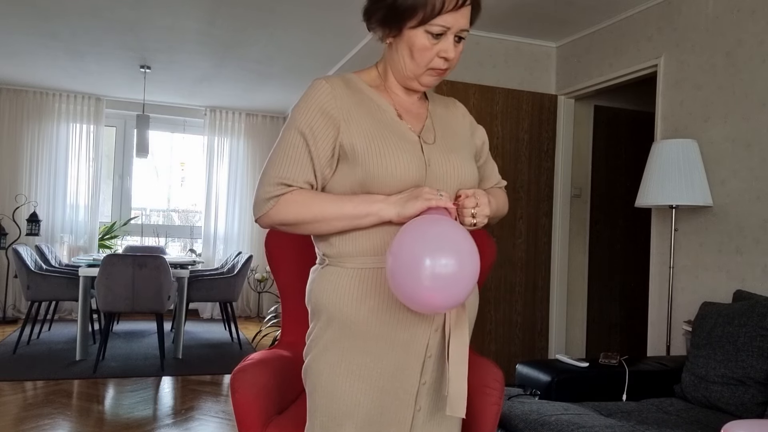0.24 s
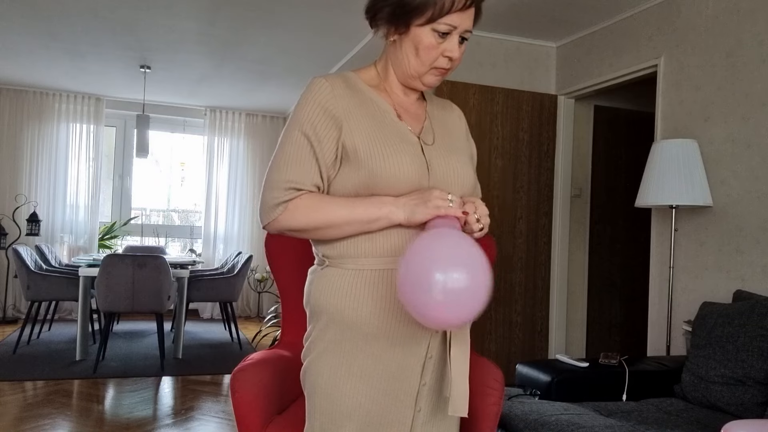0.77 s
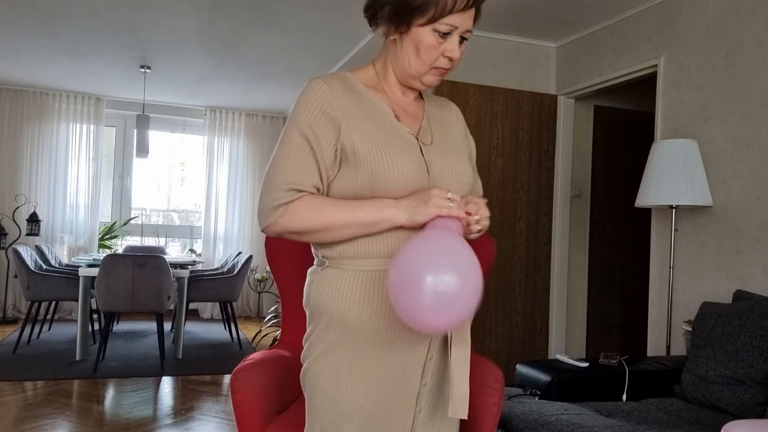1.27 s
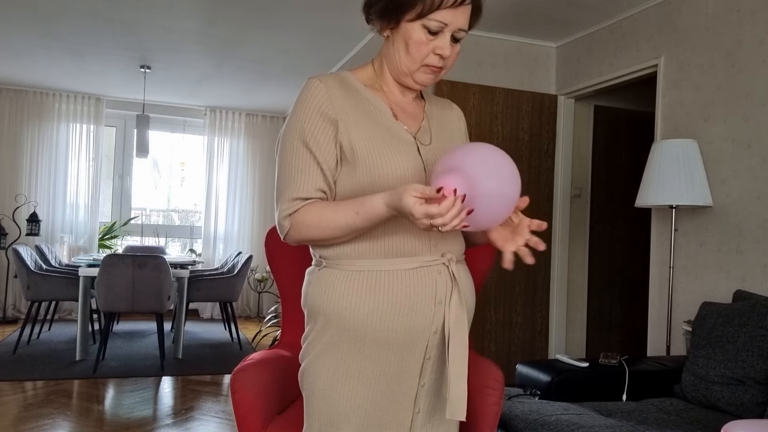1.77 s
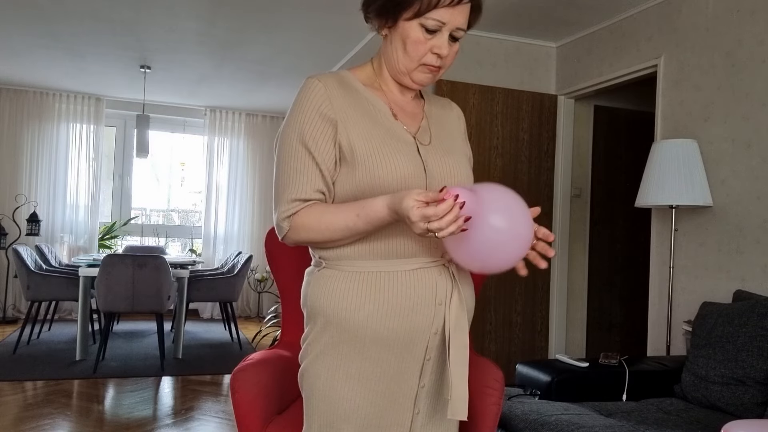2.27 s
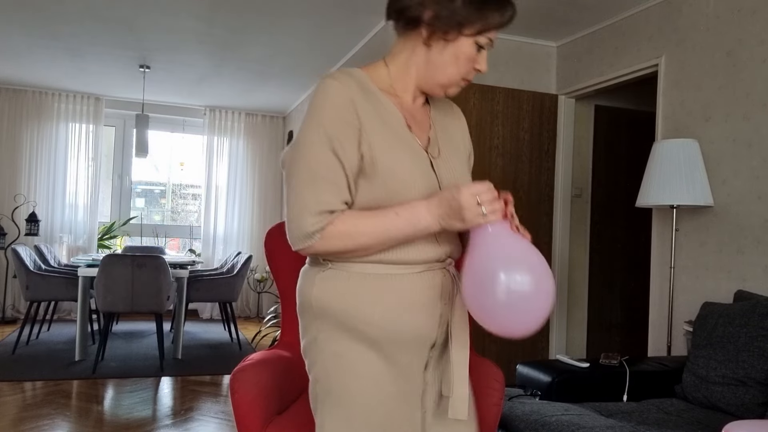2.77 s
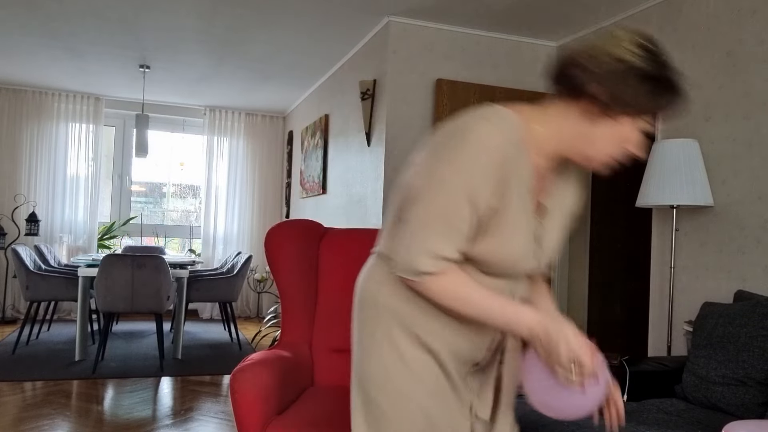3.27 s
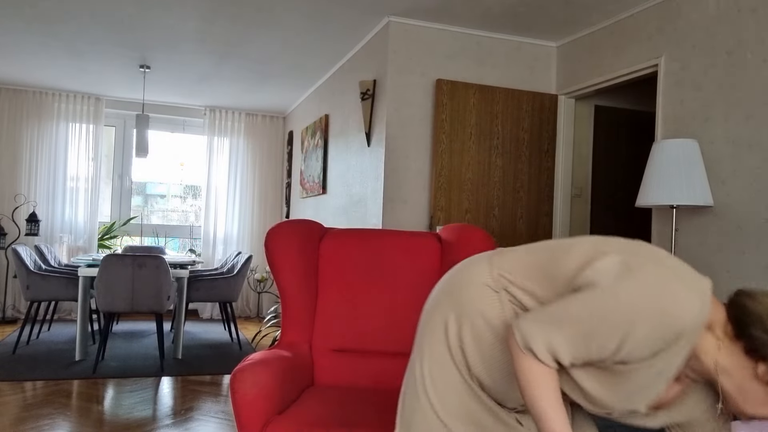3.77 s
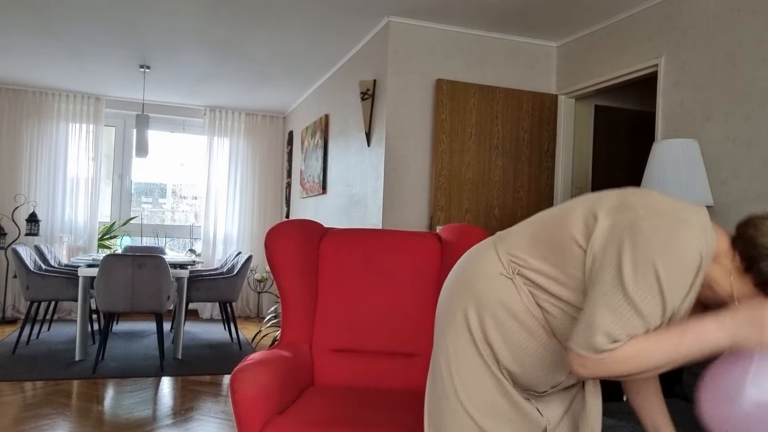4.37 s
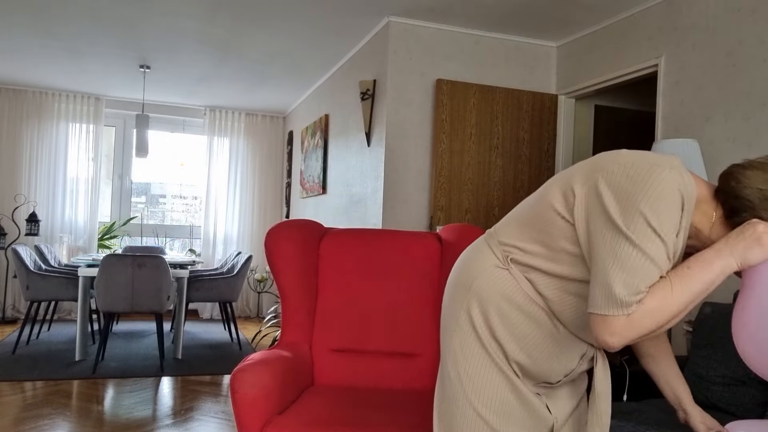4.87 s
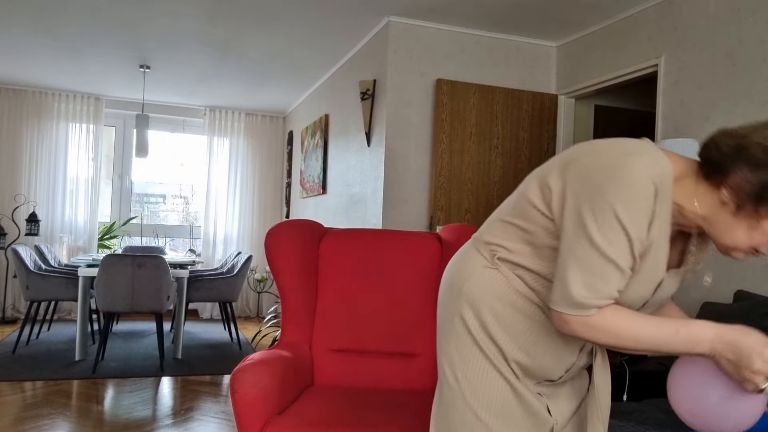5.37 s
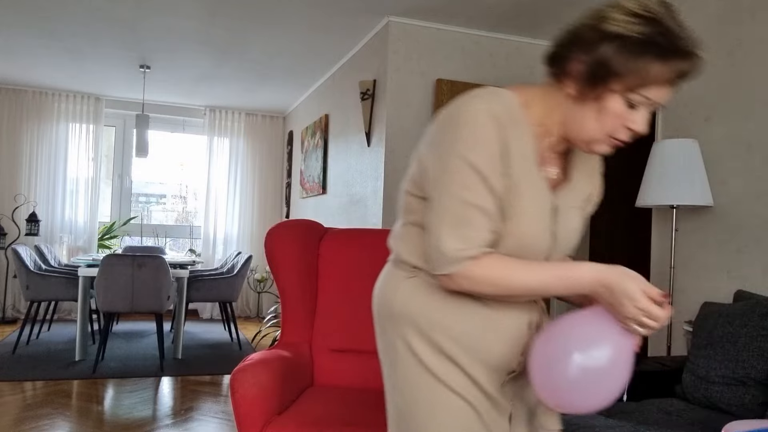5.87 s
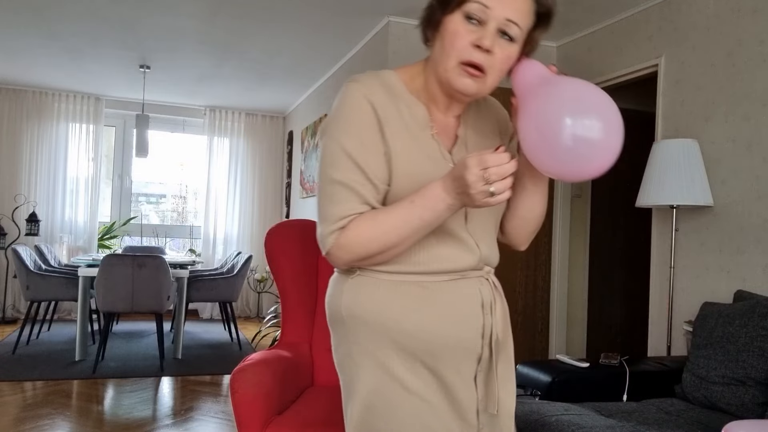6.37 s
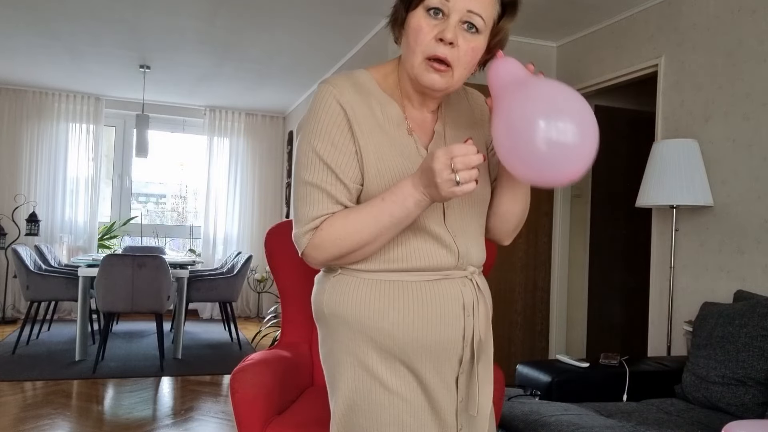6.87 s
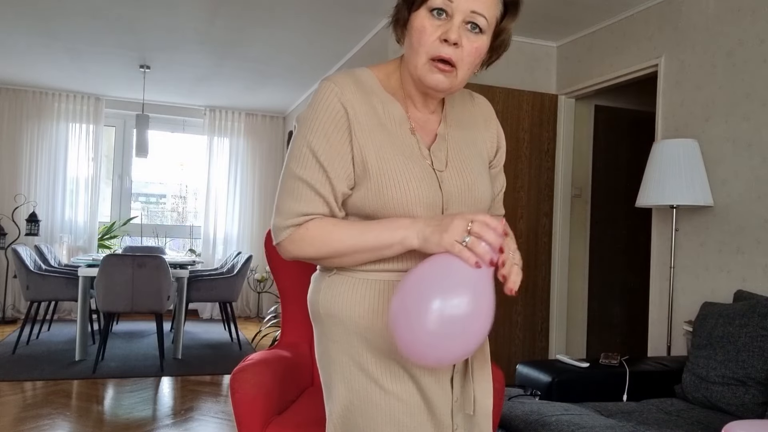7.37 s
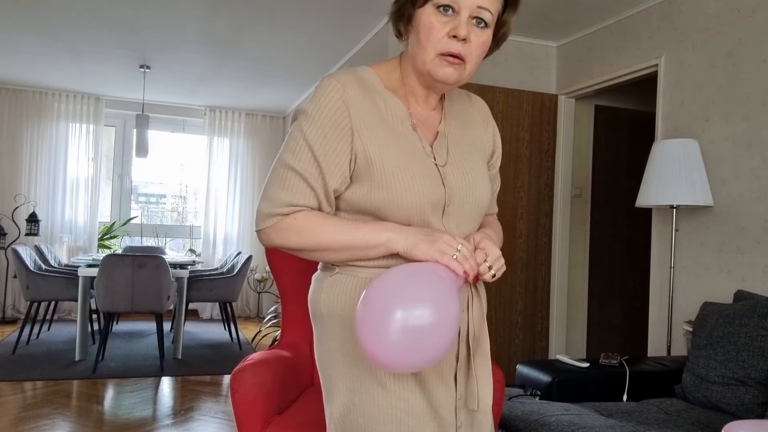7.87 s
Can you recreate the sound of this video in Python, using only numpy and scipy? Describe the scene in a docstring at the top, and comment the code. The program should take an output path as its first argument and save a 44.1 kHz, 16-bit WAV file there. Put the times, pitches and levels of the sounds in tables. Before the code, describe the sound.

Nine even, hissing strokes of a hand pump push air into a balloon, each carrying a faint, very high whistle. Between them the pump thumps softly, sucks in air and chirps faintly at the valve. The balloon's neck sings breathily early on, fingers bump and snap the rubber, and a short falling squeak comes about two thirds through. It is heard from nearby in a quiet, slightly reverberant living room.

```python
"""Hissing strokes with a very high whistle, about one a second: a hand pump fills a balloon in a living room.
Each push drives a turbulent jet and its edge tone through the nozzle and ends in a soft thump of the pump
body. Each pull draws air in more quietly, and most end in a small chirp of the valve flap. The balloon's
neck sings breathily early on; its rubber bumps, snaps under the fingers and once squeaks by stick-slip."""
import sys
import numpy as np
from scipy import signal
from scipy.fft import rfft, irfft, next_fast_len
from scipy.io import wavfile
from scipy.ndimage import uniform_filter1d, map_coordinates

SR = 44100
rng = np.random.default_rng(int(sys.argv[2]) if len(sys.argv) > 2 else 0)


def wav_record(signal):
    """Record a signal, one row per channel, as 16-bit PCM in the file named by sys.argv[1]."""
    frames = np.transpose(np.atleast_2d(signal))
    bounded = np.clip(frames, -1, 1)
    # unit amplitude maps onto the largest positive 16-bit level
    quanta = np.round(bounded * 32767).astype(np.int16)
    wavfile.write(sys.argv[1], SR, quanta)


N = 358533
TIME = np.arange(N) / SR

# Pushes of the piston: start_s, length_s, hiss_db, whistle_delay_s, whistle_top_hz, whistle_db
# (levels in all tables are relative; each source sets its own gain)
PUSHES = [(-0.12, 0.43, -33, 0.093, 14810, -3), (0.782, 0.62, -31.5, 0.133, 15100, -4),
          (1.832, 0.62, -30.5, 0.056, 15290, -3.5), (2.871, 0.64, -30.5, 0.06, 15370, -3),
          (3.902, 0.61, -30, 0.066, 15570, -1), (4.966, 0.65, -31, 0.035, 15390, -4),
          (6.017, 0.58, -30.5, 0.062, 15300, -5), (7.007, 0.61, -30.5, 0.058, 15570, -2.5),
          (8.031, 0.59, -30.5, 0.058, 15350, -1.5)]
# Pulls, each starting as the piston hits the bottom: start_s, thump_db, intake_db, column_db, seep_db
PULLS = [(0.308, -40, -44.5, -70.5, -52), (1.375, -37.5, -47, -69, -70),
         (2.413, -37.5, -43.5, -65.5, -58.5), (3.452, -39, -46, -68, -55), (4.481, -40, -47, -66.5, -53),
         (5.553, -36, -45, -61, -54), (6.554, -37.5, -46, -63.5, -49), (7.563, -37.5, -50.5, -63, -53.5)]
# Hollow bumps of the rubber near the end of some strokes: start_s, level_db, start_hz
BUMPS = [(.176, -30.5, 203.6), (2.306, -32, 199.5), (2.771, -35, 186.3), (6.468, -37, 203.5)]


def from_db(db):
    """Decibels to amplitude ratio."""
    return 10 ** (np.asarray(db) / 20)


def rms_one(x):
    """Scale to unit power."""
    return x / np.sqrt(np.mean(x ** 2) + 1e-20)


def at_hz(points, hz):
    """Interpolate a table on a log-frequency axis."""
    table_hz, value = np.transpose(points)
    return np.interp(np.log(np.maximum(hz, 1)), np.log(table_hz), value)


def curve(rows, column):
    """Interpolate one column of a table through time."""
    rows = np.array(rows)
    return np.interp(TIME, rows[:, 0], rows[:, column])


def arc(start_s, length_s):
    """A half sine, zero outside its span."""
    return np.maximum(0, np.sin(np.pi * np.clip((TIME - start_s) / length_s, 0, 1.5)))


def drift(per_s):
    """A random fluctuation of unit power that changes about per_s times a second."""
    knots = rng.standard_normal(20000)
    return rms_one(np.interp(TIME * per_s, np.arange(len(knots)), knots))


def coloured(x, spectrum):
    """Filter a sound by a smooth spectral envelope; unit power."""
    size = next_fast_len(N)
    gain = from_db(at_hz(spectrum, np.fft.rfftfreq(size, 1 / SR)))
    return rms_one(irfft(rfft(x, size) * gain, size)[:N])


def noise(spectrum):
    """Stationary noise with a given spectral envelope."""
    return coloured(rng.standard_normal(N), spectrum)


def narrow_noise(hz, width_hz):
    """Narrow-band noise: turbulence excites one resonance whose centre may move; unit power."""
    lowpass = signal.butter(2, width_hz / 2, fs=SR, output="sos")
    slow = signal.sosfilt(lowpass, rng.standard_normal((2, len(hz))))
    phase = 2 * np.pi * np.cumsum(hz) / SR
    return rms_one(slow[0] * np.cos(phase) + slow[1] * np.sin(phase))


def resonate(x, hz, width_hz):
    """A two-pole resonator with unit gain at its peak."""
    radius = np.exp(-np.pi * width_hz / SR)
    feedback = [1, -2 * radius * np.cos(2 * np.pi * hz / SR), radius ** 2]
    return signal.lfilter(np.array([1, 0, -1]) * (1 - radius ** 2) / 2, feedback, x)


def add(track, start_s, sound):
    """Superpose a sound on a track."""
    start = max(0, round(start_s * SR))
    track[start:start + len(sound)] += sound[:N - start]


def moving_echo(x, delay_s, swing, gain):
    """Comb filtering: a reflection off a moving surface interferes with the direct sound."""
    lag = delay_s * SR * np.exp(swing * drift(4))
    reflection = map_coordinates(x, [np.arange(N) - lag], order=3)
    return (x + gain * reflection) / np.sqrt(1 + gain ** 2)


def flow(attack_s=0.16, release_s=0.16, sag_db_per_s=1.5):
    """Amplitude envelope of the air flow: each push builds, sags a little and runs out."""
    out = np.zeros(N)
    for start_s, length_s, db, *_ in PUSHES:
        t = np.clip(TIME - start_s, 0, length_s)
        swell = np.sin(np.pi / 2 * np.minimum(1, t / attack_s)) ** 2
        fade = np.minimum(1, (length_s - t) / release_s)
        out += swell * fade * from_db(db - sag_db_per_s * t)
    return out


def jet(core_hz=4542, rise_hz_per_s=245, spray_rise_db_per_s=0.53):
    """Turbulence in the nozzle excites a wandering resonance and brightens as the balloon fills."""
    # Spectrum of the body of the hiss: frequency_hz, level_db
    body_spectrum = [(100, -42), (900, -26.5), (1400, -21.5), (1950, -6), (2300, -8.5), (2800, -12.5),
                     (3100, -5), (4200, -4), (5500, -0.5), (7400, -5), (8500, -8), (11000, -72)]
    # Spectrum of its high spray: frequency_hz, level_db
    spray_spectrum = [(4000, -57), (6500, 7), (8000, 6), (9500, 1), (11500, 2.5), (13000, 0.5),
                      (14300, 10.5), (15200, 13), (15900, -7)]
    centre_hz = (core_hz + rise_hz_per_s * TIME) * np.exp(0.05 * drift(6))
    core = from_db(-4.5) * narrow_noise(centre_hz, width_hz=1190)
    spray = from_db(-2.5 + spray_rise_db_per_s * TIME) * noise(spray_spectrum)
    body = from_db(-1) * noise(body_spectrum)
    flutter = from_db(0.17 * drift(70) + 0.72 * drift(11))
    hiss = (body + core + spray) * flow() * flutter
    return moving_echo(hiss, delay_s=0.001374, swing=0.08, gain=0.24)


def whistle(rest_hz=14640, stops_early_s=0.055, flutter_db=4.5, gain_db=-3):
    """An edge tone follows the piston's speed, shaken by turbulence and loudest at the nozzle's resonance."""
    # Resonance curve of the nozzle: pitch_hz, level_db
    nozzle = [(14620, -41), (14780, -27.5), (14900, -12), (15020, -12.5), (15150, -11), (15320, -14.5),
              (15500, -21.5)]
    hz, gain = rest_hz + 35 * drift(16), 0
    for start_s, length_s, _, delay_s, top_hz, db in PUSHES:
        speed = arc(start_s + delay_s, length_s - delay_s - stops_early_s) ** 0.72
        hz = hz + (top_hz - rest_hz) * speed
        gain = gain + np.minimum(1, 10 * speed) * from_db(db)
    phase = 2 * np.pi * np.cumsum(hz + 50 * drift(700)) / SR
    level_db = at_hz(nozzle, hz) + gain_db + flutter_db * np.minimum(1, drift(110))
    return gain * from_db(level_db) * np.sqrt(2) * np.sin(phase)


def neck(width_hz=230, gain_db=1.5):
    """Air forcing the balloon's slack neck open excites a few sinking resonances."""
    # Breathy tones of the neck: start_s, length_s, start_hz, end_hz, level_db
    tones = [(0, .08, 2080, 2020, -45), (.82, .2, 3600, 3420, -39), (.85, .17, 5480, 5330, -38),
             (.83, .15, 7950, 7750, -47)]
    out = np.zeros(N)
    for start_s, length_s, start_hz, end_hz, db in tones:
        hz = np.geomspace(start_hz, end_hz, int(length_s * SR))
        swell = np.sin(np.linspace(0, np.pi, len(hz)))
        add(out, start_s, from_db(db + gain_db) * swell * narrow_noise(hz, width_hz))
    return out


def valve(leak_s=0.22, leak_start_hz=1375, leak_end_hz=898):
    """The valve flap oscillates in the air stream, singing in short, unsteady glides."""
    # Chirps of the flap: start_s, length_s, start_hz, end_hz, level_db
    chirps = [(0, 0.187, 571, 483.5, -53.5), (2.836, 0.023, 854, 920, -53), (3.839, 0.063, 656, 820, -52),
              (4.92, 0.028, 803, 917, -47), (6.963, 0.019, 860, 900, -47), (7.977, 0.025, 624, 780, -44.5)]
    # Thin falling tones of the valve during some pushes: start_s, level_db
    leaks = [(1.956, -50), (3.018, -56), (4.049, -51.5), (6.136, -45.5), (7.136, -54)]
    glides = chirps + [(start_s, leak_s, leak_start_hz, leak_end_hz, db) for start_s, db in leaks]
    out, waver = np.zeros(N), 1 + 0.019 * drift(300)
    for start_s, length_s, start_hz, end_hz, db in glides:
        along = np.linspace(0, 1, int(length_s * SR))
        hz = start_hz * (end_hz / start_hz) ** along * waver[int(start_s * SR):][:len(along)]
        tone = np.sqrt(2) * np.sin(2 * np.pi * np.cumsum(hz) / SR)
        add(out, start_s, from_db(db) * np.sin(np.pi * along) * tone)
    return out


def ambience(gain_db=-53.5):
    """Quiet background noise of the room, largely correlated between the two channels."""
    # Spectrum of the room air: frequency_hz, level_db
    spectrum = [(25, -4.5), (65, 11.5), (130, -12.5), (300, 1.5), (900, -3), (1500, -10), (3000, 3.5),
                (6000, -6), (15000, -1)]
    mid, side = noise(spectrum), noise(spectrum)
    return from_db(gain_db) * (mid + 0.5 * side * np.array([[1], [-1]]))


def bumps(rise_per_s=9.76, t60_s=0.17, gain_db=-1):
    """Stretched rubber is nudged like a membrane; its hollow note climbs as the tension rises."""
    out, t = np.zeros(N), TIME[:SR // 4]
    attack = 1 - np.exp(-t / 0.011)
    for start_s, db, start_hz in BUMPS:
        hz = start_hz * (1 + rise_per_s * t)
        note = np.sin(2 * np.pi * np.cumsum(hz) / SR) + 0.9 * narrow_noise(hz, width_hz=74)
        add(out, start_s, from_db(db + gain_db - 60 * t / t60_s) * attack * note)
    return out


def thumps(bottom_hz=97.5, shudder_s=0.034, jolt_db=-5.5, gain_db=6):
    """Padded blows ring the pump body's damped modes, favouring those near each blow's centre frequency."""
    # Modes of the pump body: frequency_hz, level_db, t60_s
    modes = [(73.4, -2, 0.11), (109.5, -5, 0.07), (136.3, -3, 0.23), (159, 0.5, 0.043),
             (202.6, -6.5, 0.084), (282.4, -10, 0.088), (349, -0.5, 0.026), (407.4, -3, 0.078),
             (630, -9.5, 0.05), (925, -23, 0.15)]
    # Knocks of the piston at the top of its travel: start_s, peak_db, centre_hz
    top_knocks = [(0.717, -49.5, 94), (1.786, -49, 198), (2.861, -44, 80), (3.862, -46.5, 173),
                  (4.915, -51, 183), (5.97, -47.5, 89), (6.904, -53.5, 106), (7.979, -48, 204)]
    bottom_knocks = [(start_s, db, bottom_hz) for start_s, db, *_ in PULLS]
    bump_jolts = [(start_s, db + jolt_db, hz) for start_s, db, hz in BUMPS]
    out, t = np.zeros(N), TIME[:SR // 2]
    for start_s, db, centre_hz in bottom_knocks + top_knocks + bump_jolts:
        force = 0.052 * rng.standard_normal(len(t)) * np.exp(-t / shudder_s)
        force[0] += 1   # the impulse ahead of the shudder
        ring = 0
        for k, (hz, mode_db, t60_s) in enumerate(modes):
            off_centre_db = min(12.5 * np.log2(hz / centre_hz) ** 2, 11)
            decay = from_db(mode_db - off_centre_db - 60 * t / t60_s)
            ring = ring + (-1) ** k * decay * np.sin(2 * np.pi * hz * t)
        blow = signal.fftconvolve(force, ring)[:len(t)]
        add(out, start_s, from_db(db + gain_db) * blow / np.abs(blow).max())
    return signal.sosfilt(signal.butter(2, 42, "high", fs=SR, output="sos"), out + 1e-18)


def intake(pull_s=0.37, rub_hz=2900, rub_db=-12.5, scrape_db=7, seep_gain_db=10):
    """Flow noise and piston friction peak in mid-pull, while air keeps seeping from the balloon's neck."""
    # Spectrum of the indrawn air: frequency_hz, level_db
    draw_spectrum = [(200, -9), (900, -6.5), (1500, -7.5), (2400, -11), (3200, -1), (4500, -1),
                     (5450, 10.5), (6400, -12), (7800, 1), (10000, -27)]
    # Spectrum of the seeping air: frequency_hz, level_db
    seep_spectrum = [(2000, -20), (5000, -5), (7700, 1), (9500, -1.5), (11000, -0.5), (12600, 4),
                     (14000, 4.5), (15700, 3.5)]
    suction = sum(from_db(db) * arc(start_s, pull_s) ** 1.5 for start_s, _, db, _, _ in PULLS)
    rub = narrow_noise(rub_hz * np.exp(0.15 * drift(12)), width_hz=470)
    draw = noise(draw_spectrum) + from_db(rub_db + scrape_db * drift(30)) * rub
    # The seal holds through each pull and shifts with every push.
    seal = [(t, db) for start_s, *_, db in PULLS for t in (start_s, start_s + pull_s)]
    seep = from_db(seep_gain_db + curve(seal, column=1)) * noise(seep_spectrum)
    return suction * draw + seep


def barrel(long_hz=175, short_hz=560, width_hz=45, rest_s=0.037, travel_s=0.295):
    """The piston shortens the air column, so its quarter-wave resonance and third harmonic climb."""
    out, along = np.zeros(N), np.linspace(0, 1, int(travel_s * SR))
    hz = 1 / ((1 - along) / long_hz + along / short_hz)
    swell = np.sqrt(np.abs(np.sin(np.pi * along)))
    for start_s, _, _, db, _ in PULLS:
        column = narrow_noise(hz, width_hz) + from_db(1) * narrow_noise(3 * hz, width_hz)
        add(out, start_s + rest_s, from_db(db) * swell * column)
    return out


def snaps(width_hz=1500, crack=0.19, gain_db=10):
    """Rubber slips off the fingers: bursts of friction noise in a broad resonance, with a bright edge."""
    # Snaps of the rubber: start_s, peak_db, centre_hz, t60_s
    releases = [(.365, -42.5, 1820, 0.071), (0.713, -39, 1690, 0.041), (1.103, -43, 780, 0.043),
                (1.782, -47.5, 2210, 0.088), (2.639, -37.5, 2570, 0.035), (2.725, -33, 3400, 0.029),
                (2.999, -40.5, 885, 0.088), (6.872, -31.5, 3100, 0.02)]
    out, t = np.zeros(N), TIME[:SR // 5]
    attack = 1 - np.exp(-t / 0.0028)
    for start_s, db, hz, t60_s in releases:
        slip = rng.standard_normal(len(t)) * from_db(-60 * t / t60_s) * attack
        burst = resonate(slip, hz, width_hz) + crack * slip
        add(out, start_s, from_db(db + gain_db) * burst / np.abs(burst).max())
    return out


def squeak(jitter=0.27, rasp=0.055, rough_hz=170, grab_db=1.5):
    """Stick-slip friction: each slip sends a pulse into the balloon's skin; slow slipping is irregular."""
    # Course of the rub: time_s, slip_rate_hz, level_db
    rub = [(5.648, 2110, -56), (5.675, 2060, -24), (5.694, 2030, -25), (5.698, 1360, -25),
           (5.725, 940, -23), (5.745, 680, -28), (5.785, 400, -44), (5.824, 600, -34), (5.87, 350, -64)]
    # Response of the rubber skin: frequency_hz, level_db
    skin_spectrum = [(300, -3.5), (1000, -3), (2000, -3.5), (2800, 1.5), (3400, -1), (4200, 2), (5100, 9),
                     (6300, -3.5), (8000, -5.5), (10000, -19.5), (15000, -13)]
    slip_hz = curve(rub, column=1)
    roughness = np.minimum(1, rough_hz / slip_hz)
    cycles = np.cumsum(slip_hz * np.exp(jitter * roughness * drift(900))) / SR
    slips = np.diff(cycles % 1, prepend=0) + rasp * np.sqrt(roughness) * rng.standard_normal(N)
    skin = coloured(slips, skin_spectrum)
    skin /= np.sqrt(uniform_filter1d(skin ** 2, size=400) + 1e-9)   # equal power at every slip rate
    rubbing = (TIME > rub[0][0]) & (TIME < rub[-1][0])
    return skin * rubbing * from_db(curve(rub, column=2) + grab_db * drift(160))


def room(x, wet_db, left_db, early, left_lag_samples=14):
    """Direct sound arrives on the right first; early reflections follow, and reverberation dies by band."""
    # Reverberation time of the room: frequency_hz, t60_s
    reverb_times = [(100, 0.53), (1000, 0.54), (5000, 0.42), (10000, 0.18), (15000, 0.24)]
    t, tail = TIME[:SR // 2], 0
    edges_hz = np.geomspace(50, 18000, 10)
    for low, high in zip(edges_hz, edges_hz[1:]):
        hz = np.sqrt(low * high)
        bandpass = signal.butter(2, [low, high], "band", fs=SR, output="sos")
        mid, side = signal.sosfilt(bandpass, rng.standard_normal((2, len(t))))
        coherence = 1 / (1 + (hz / 600) ** 2)   # long waves reach both sides alike
        band = np.sqrt(1 + coherence) * mid + np.sqrt(1 - coherence) * side * [[1], [-1]]
        tail = tail + band * from_db(-60 * t / at_hz(reverb_times, hz))
    tail = tail * (1 - np.exp(-t / 0.00067))
    response = rms_one(tail) / np.sqrt(len(t))
    for ear in response:
        wall_lags = (rng.uniform(0.001, 0.012, 6) * SR).astype(int)
        ear[wall_lags] += early * rng.choice([-1, 1], 6) / np.sqrt(6)
    response *= from_db(wet_db)
    response[[0, 1], [left_lag_samples, 0]] += 1   # the direct sound
    response /= np.sqrt(np.sum(response ** 2) / 2)
    balance = from_db([[left_db / 2], [-left_db / 2]])
    return signal.fftconvolve(x[None], response, axes=1)[:, :N] * balance


def scene():
    """The sources superpose in the room; the moving hands reflect the hiss differently to each side."""
    air = room(jet() + neck() + intake(), wet_db=-2, left_db=-1.06, early=1)
    air = np.array([moving_echo(ear, delay_s=0.0036, swing=0.038, gain=0.54) for ear in air])
    pipes = room(valve() + barrel(), wet_db=-7.5, left_db=-5, early=0.89)
    tone = room(whistle(), wet_db=-1.5, left_db=-4, early=1)
    knocks = room(thumps() + bumps(), wet_db=-9, left_db=-1, early=0.066)
    rubber = room(squeak() + snaps(), wet_db=-4.5, left_db=-0.3, early=1.1)
    return air + pipes + tone + knocks + rubber + ambience()


def record(dry, cutoff_hz=15850):
    """A steep low-pass filter removes the highest treble."""
    return signal.sosfilt(signal.ellip(12, 0.1, 90, cutoff_hz, fs=SR, output="sos"), dry)


dry = scene()
out = record(dry)
wav_record(out)
```